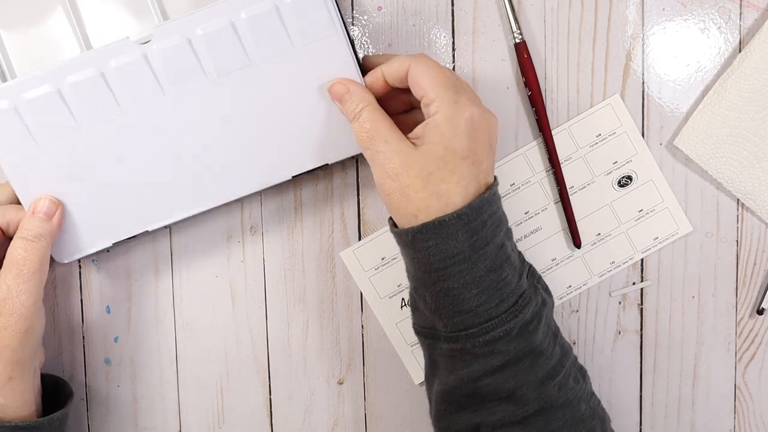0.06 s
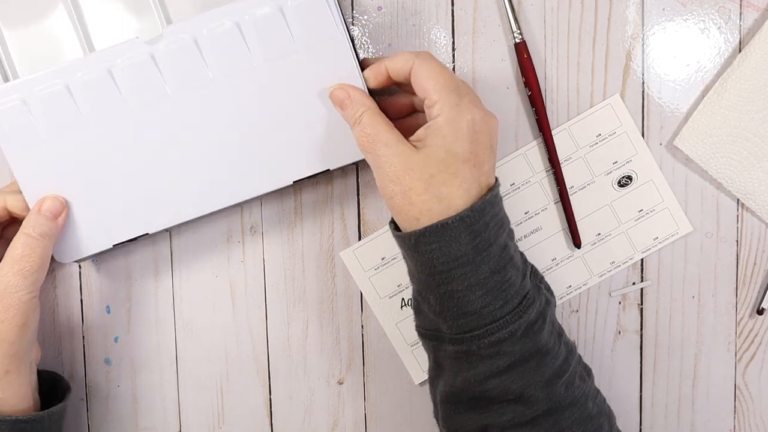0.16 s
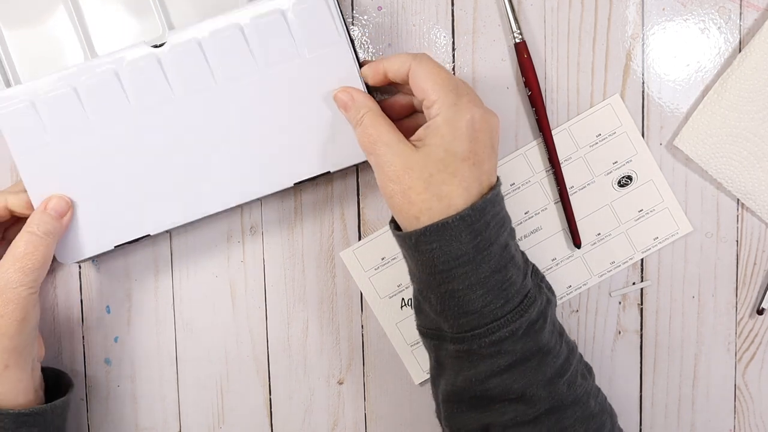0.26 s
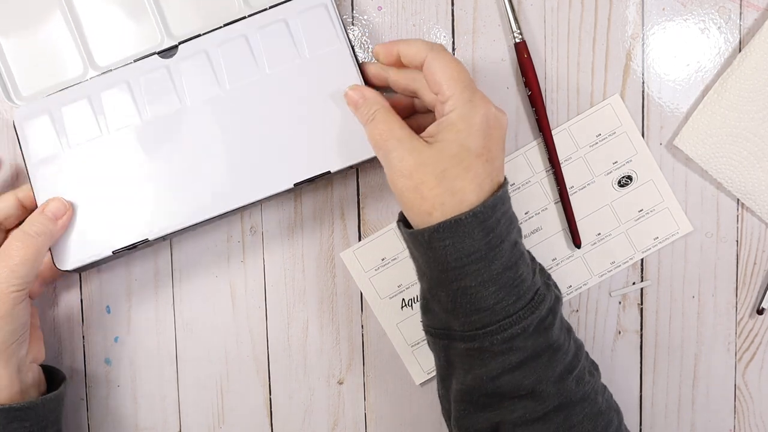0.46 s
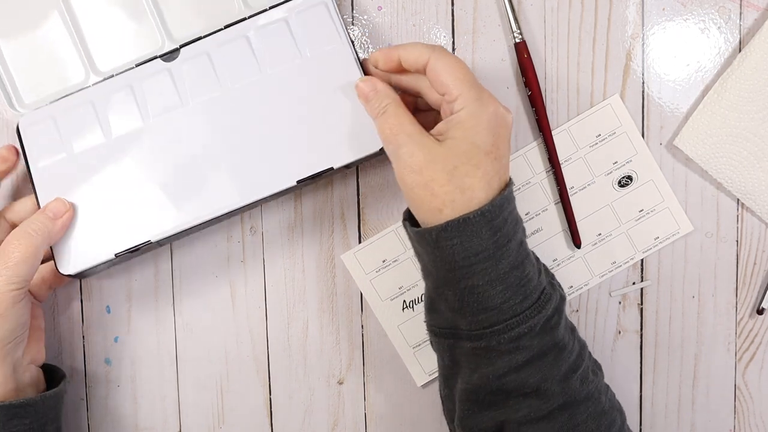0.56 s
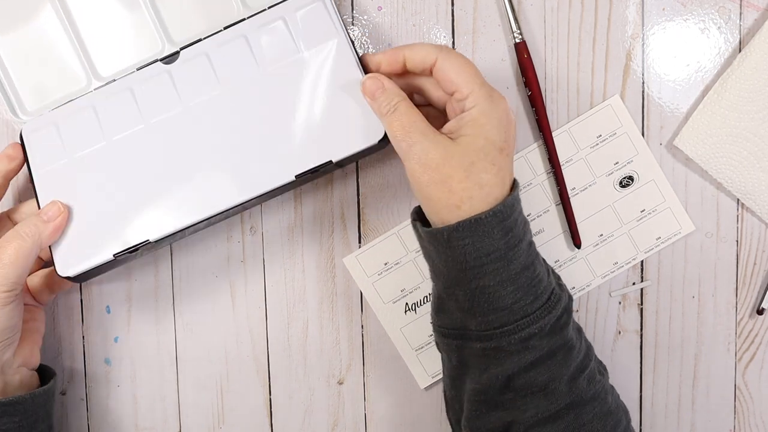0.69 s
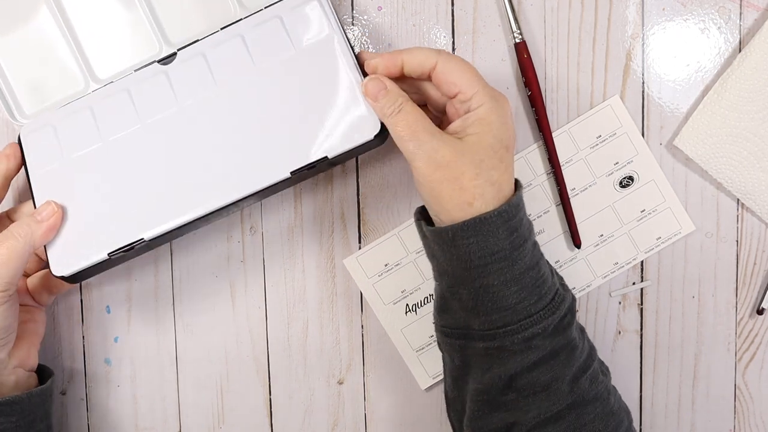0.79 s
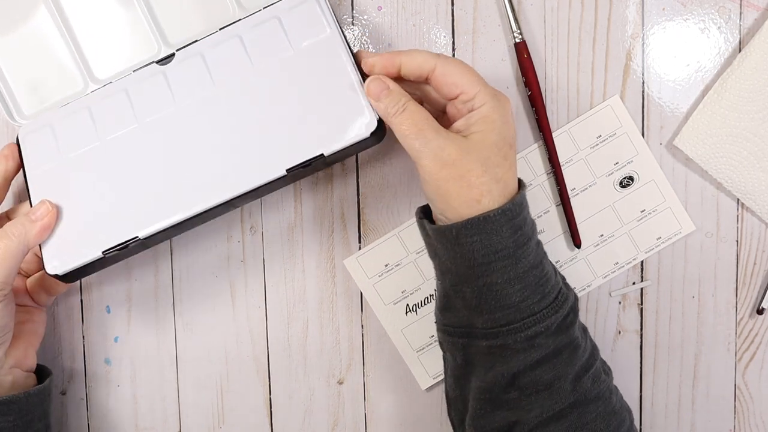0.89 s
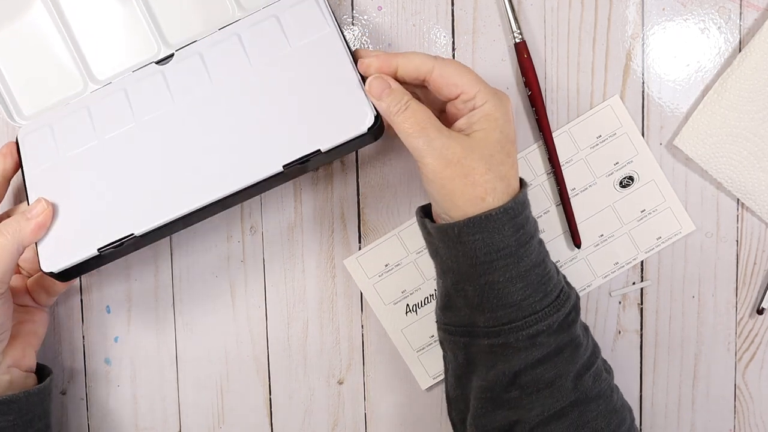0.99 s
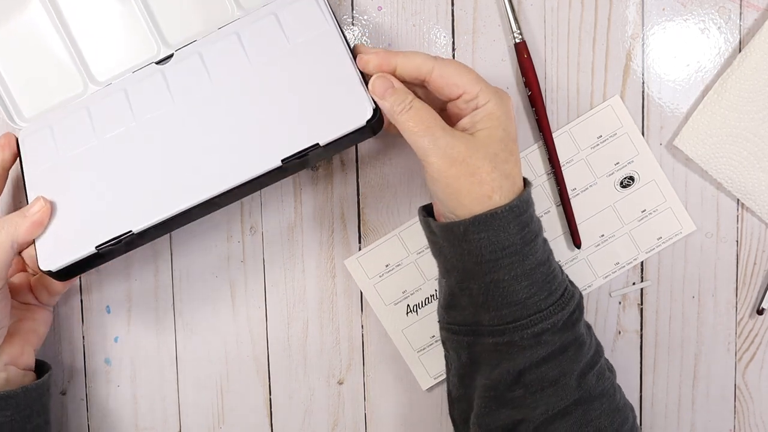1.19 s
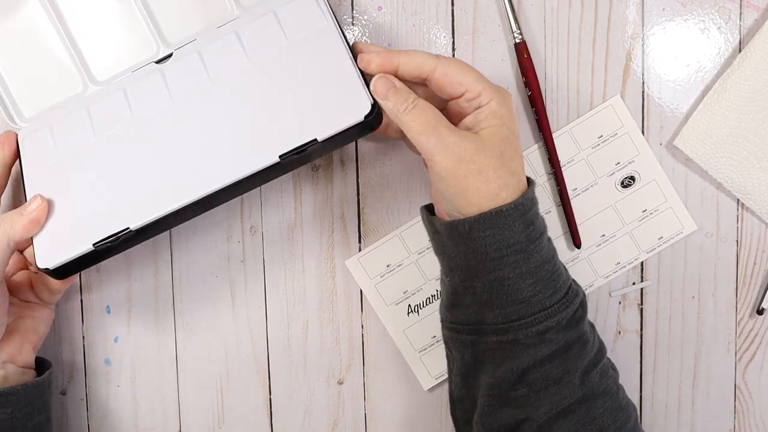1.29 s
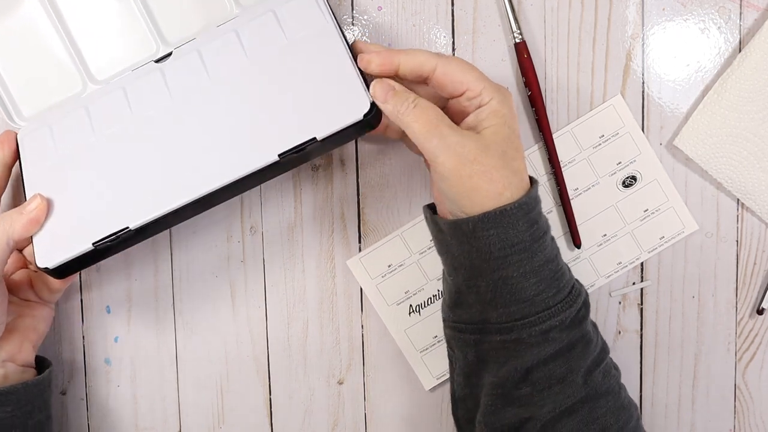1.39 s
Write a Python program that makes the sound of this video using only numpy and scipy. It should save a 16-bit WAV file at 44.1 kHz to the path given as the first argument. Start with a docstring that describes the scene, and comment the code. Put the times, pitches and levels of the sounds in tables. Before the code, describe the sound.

Close, mono sound of a metal paint tin lid ticking and flexing, then cracking free with a bright clank and short room echo; a muffled tap and a light tap pair follow over faint room noise.

```python
"""First, fingers rub and a tin rumbles on a wooden table over the faint noise of a quiet room.
Two hands prise at the metal lid: the thin sheet ticks, flexes with a dull knock, snaps free of its
catch and taps twice more, and a low boom lingers after the stronger blows.
Rub, rumble and room are coloured noise; booms and bending modes are decaying sines.
Each contact on the lid layers a crack, a crash of noise bands, blurred ringing modes and a room echo."""
import sys
import numpy as np
from scipy import signal
from scipy.fft import rfft, irfft
from scipy.io import wavfile
from scipy.ndimage import uniform_filter1d

SR = 44100
rng = np.random.default_rng(int(sys.argv[2]) if len(sys.argv) > 2 else 0)


def digitize_waveform(pressure):
    """Quantize a signal to 16-bit integers and store it at the path in sys.argv[1].

    Rows of a 2-D input are taken as channels; values are limited to [-1, 1].
    """
    field = np.atleast_2d(pressure).T
    bounded = np.clip(field, -1, 1)
    quanta = np.round(bounded * 32767).astype(np.int16)
    wavfile.write(sys.argv[1], SR, quanta)


N = 63945
T = np.arange(N) / SR
EDGES = 25 * 2 ** (np.arange(39) / 4)  # quarter-octave band edges [Hz]
CENTRES = np.sqrt(EDGES[1:] * EDGES[:-1])

# Colour of the room's faint noise: (frequency [Hz], relative density [dB per Hz])
FLOOR_SPECTRUM = [(71, -35), (120, -3), (216, -1), (319, -3), (611, -6), (649, -8.5), (796, -9.5),
                  (1990, -14), (15500, -20.5)]
FLOOR_DB = -67

# Fingers rubbing on the lid: (time [s], level [dB])
RUB_LEVEL = [(0, -60), (.09, -59), (.15, -67), (.19, -60.5), (.3, -64), (.65, -88), (.8, -74), (.95, -72.5),
             (1.45, -73.5)]
# Colour of the rub: (frequency [Hz], relative density [dB per Hz])
RUB_SPECTRUM = [(100, -6.5), (400, -2), (1400, 3.5), (2400, -4), (4000, -5), (6000, -16), (16000, -23)]
RUB_FLICKER_DB = 2  # standard deviation
# Rumble of the handled tin: (time [s], level [dB])
RUMBLE_LEVEL = [(0, -59), (.3, -57.5), (.42, -55.5), (.6, -57), (.88, -54.5), (1.0, -59.5), (1.45, -65)]
# Colour of the rumble: (frequency [Hz], relative density [dB per Hz])
RUMBLE_SPECTRUM = [(25, -14), (40, 3.5), (65, 5), (105, 0), (150, -11), (250, -22), (800, -66)]

# Low booms of table and room: (time [s], level [dB])
BOOMS = [(0.457, -40), (0.726, -45.5)]
# Modes of each boom: (frequency [Hz], level relative to the boom [dB], T60 [s])
BOOM_MODES = [(38.2, 0, 1.2), (66.2, -7.5, 1.1), (97.3, 5.5, 0.57)]
BOOM_RISE_S = 0.017

# Faint ticks and bumps of the rim, and a compact ping that is part of the lid's tap near 0.585 s: (time [s],
# level [dB], centre frequency [Hz])
RIM_TICKS = [(0.086, -59, 1360), (0.346, -49.5, 3750), (0.3635, -52, 8000), (0.465, -31, 1560),
             (.543, -48, 2860), (0.584, -39.5, 1240), (0.793, -57.5, 1140), (0.801, -53.5, 212),
             (0.701, -43.5, 260), (0.7, -43.5, 3960), (0.174, -46.5, 760), (0.211, -42.5, 3060),
             (0.803, -63, 4470), (0.944, -67.5, 6000)]
TICK_RISE_S, TICK_T60_S = 0.003, 0.054

# Dull knocks of the flexing sheet: (time [s], level [dB])
KNOCKS = [(.3333, -36.5), (.3438, -42)]
# Low bending modes of the sheet: (frequency [Hz], level relative to the knock [dB], T60 [s])
BENDING_MODES = [(191, -15, 0.6), (449, -10.5, 0.33), (513, -2.5, 0.037), (596, -3, 0.15), (770, 1.5, .12),
                 (928, 1.5, 0.11), (1085, -7, .09), (1231, -7.5, .1)]
# Colour of the dull wash around a knock: (frequency [Hz], relative density [dB per Hz])
KNOCK_WASH = [(100, -4), (200, 3), (300, -8.5), (480, 0), (1000, -3.5), (1500, -13), (4500, -24),
              (6000, -34), (16000, -47)]
WASH_DB, WASH_T60_S, KNOCK_RISE_S = -2.5, 0.65, 0.00061  # wash level is relative to the knock

# Contacts on the lid: (time [s], level [dB], brightness cutoff [Hz], low body boost [dB],
# ring level [dB], rise time constant [s], crash length factor [1], room level [dB], crack level [dB]);
# the boost and the last three levels are relative
CONTACTS = [ (.1722, -40, 6480, -4, -16, 0.0026, 1.33, -16, -4),
            (.2110, -30, 5410, -6, -3, 0.0013, 0.6, -34, 2),
            (.2155, -32.5, 9070, 10, -5, 0.00045, 1.3, -17, 2),
            (.3971, -14.5, 11000, -4.5, -0.5, 0.000038, 0.85, -13.5, -34),
            (.4070, -18.5, 12000, 2, -7.5, 0.00058, 1.16, -12, 1.5),
            (.5848, -35.5, 1580, -16, -4, 0.0011, 1.1, -17, -11),
            (.7016, -40.5, 11200, 17, -17, 0.000068, 0.97, -11, -12),
            (.7042, -38, 6760, -12, -18, 0.000088, 1.1, -14, -16),
            (.7150, -48, 4930, 21.5, 1.5, 0.00097, 2.4, -22, 8)]
# The lid's crowd of overlapping modes: (frequency [Hz], relative density [dB per Hz])
SHEET_SPECTRUM = [(100, -16), (180, -14.5), (290, -22.5), (450, -8.5), (630, -11), (800, -3), (1300, 4),
                  (2200, -3.5), (3600, -4.5), (6200, -15.5), (8200, -11), (11500, -19), (16000, -22)]
# Their decay under the hands, before the length factor: (frequency [Hz], T60 [s])
SHEET_T60 = [(200, 0.075), (1200, 0.037), (4000, 0.041), (14000, 0.079)]
# The lid's clear modes: (frequency [Hz], relative level [dB], T60 before finger damping [s])
LID_MODES = [(761, -16, .15), (815, -14, .19), (941, -14, .14), (1010, -15, .12), (1090, -13, .13),
             (1180, -11, .1), (1260, -11, .08), (1356, -7, .14), (1449, -12, .19), (1527, -13, .26),
             (1707, -13, .2), (1893, -12, .2), (2008, -15, .18), (2388, -19, .23), (2920, -13, .14),
             (3651, -14, .17), (4144, -17, .17), (4493, -21, .18), (5190, -21, .22), (8017, -18, .14)]
# Fingers shorten the rings; reflections blur their lines
RING_DAMPING, RING_BLUR_HZ = 0.79, 4.6
BODY_HZ = 580  # the low body boost fades out above this
CRACK_T60_S, CRACK_TILT_DB_PER_OCTAVE = 0.0084, 1.6
# Decay of the room echo: (frequency [Hz], T60 [s])
ROOM_T60 = [(150, 1.16), (700, 0.38), (1300, 0.326), (3000, 0.3521), (5200, 0.33), (9000, 0.2564),
            (15000, 0.15)]
# Colour of the room echo: (frequency [Hz], level [dB])
ROOM_COLOUR = [(150, -1), (800, -7), (1600, 2), (3000, -4), (5000, 4.5), (9000, 0.5), (15000, -3.5)]
ROOM_BUILD_S, BLOW_S = 0.02, 0.75  # echo build-up; span rendered for each contact
CUTOFF_HZ = 15900


def from_db(db):
    """Turn decibels into gain."""
    return 10 ** (np.asarray(db) / 20)


def at_hz(points, hz=CENTRES):
    """Read a table on a log-frequency axis, as a column."""
    f, v = np.transpose(points)
    return np.interp(np.log(hz), np.log(f), v)[:, None]


def band_gains(spectrum):
    """Gain of each quarter octave, for a total power of one."""
    gains = from_db(at_hz(spectrum)) * np.sqrt(CENTRES)[:, None]  # wider bands hold more power
    return gains / np.sqrt(np.sum(gains ** 2))


def noise_bands(size):
    """Split white noise into quarter-octave bands, each of RMS one."""
    white = rfft(rng.standard_normal(size))
    hz = np.arange(size // 2 + 1) * SR / size
    bands = []
    for low, high in zip(EDGES, EDGES[1:]):
        bands.append(irfft(white * ((hz >= low) & (hz < high)), size))
    bands = np.array(bands)
    return bands / bands.std(axis=1, keepdims=True)


def hiss(spectrum):
    """Steady noise of a given colour, RMS one."""
    hz = np.maximum(np.arange(N // 2 + 1) * SR / N, 1)
    colour = from_db(at_hz(spectrum, hz)[:, 0]) * (hz > EDGES[0])
    noise = irfft(rfft(rng.standard_normal(N)) * colour, N)
    return noise / noise.std()


def decay(t, t60):
    """Exponential decay, falling 60 dB in each T60."""
    return np.exp(-np.log(1000) * np.minimum(t / t60, 10))


def onset(start_s, rise_s):
    """Time since a blow, and its attack."""
    t = np.maximum(T - start_s, 0)
    return t, 1 - np.exp(-t / max(rise_s, 1 / SR))


def softness(hz, bright_hz):
    """A soft contact leaves the high modes quiet."""
    return 1 / np.sqrt(1 + (hz / bright_hz) ** 6)


def ring(t, hz, t60):
    """One mode dying away, its line blurred by a wandering phase."""
    wander = np.cumsum(rng.standard_normal(len(t))) * np.sqrt(2 * np.pi * RING_BLUR_HZ / SR)
    wander = uniform_filter1d(wander, size=200)
    phase = 2 * np.pi * (hz * t + rng.random()) + wander
    return np.sin(phase) * decay(t, RING_DAMPING * t60)


def room_floor():
    """The quiet room's noise, steady and faint."""
    return from_db(FLOOR_DB) * hiss(FLOOR_SPECTRUM)


def handling():
    """Fingers rub unevenly on the sheet while the tin rumbles on the table."""
    grip = uniform_filter1d(rng.standard_normal(N), size=500)
    rub_db = np.interp(T, *np.transpose(RUB_LEVEL)) + RUB_FLICKER_DB * grip / grip.std()
    rub = from_db(rub_db) * hiss(RUB_SPECTRUM)
    rumble_db = np.interp(T, *np.transpose(RUMBLE_LEVEL))
    rumble = from_db(rumble_db) * hiss(RUMBLE_SPECTRUM)
    return rub + rumble


def booms():
    """Low modes swell and linger after the stronger blows."""
    out = np.zeros(N)
    for start_s, db in BOOMS:
        t, attack = onset(start_s, BOOM_RISE_S)
        for hz, mode_db, t60 in BOOM_MODES:
            out += from_db(db + mode_db) * attack * np.sin(2 * np.pi * hz * t) * decay(t, t60)
    return out


def rim_ticks():
    """Small slips of the rim, and a compact ping within the lid's tap near 0.585 s: bursts of noise, each about
    an octave wide."""
    out = np.zeros(N)
    for start_s, db, hz in RIM_TICKS:
        t, attack = onset(start_s, TICK_RISE_S)
        octave = [hz / np.sqrt(2), hz * np.sqrt(2)]
        band = signal.butter(2, octave, "band", fs=SR, output="sos")
        grain = signal.sosfilt(band, rng.standard_normal(N))
        out += from_db(db) * grain / grain.std() * attack * decay(t, TICK_T60_S)
    return out


def knocks():
    """The pressed sheet gives way and sounds its low bending modes in a dull wash."""
    out = np.zeros(N)
    for start_s, db in KNOCKS:
        t, attack = onset(start_s, KNOCK_RISE_S)
        rings = np.zeros(N)
        for hz, mode_db, t60 in BENDING_MODES:
            tone = np.sin(2 * np.pi * (hz * t + rng.random()))
            rings += from_db(mode_db) * tone * decay(t, t60)
        wash = from_db(WASH_DB) * hiss(KNOCK_WASH) * decay(t, WASH_T60_S)
        out += from_db(db) * attack * (rings + wash)
    return out


def room_echo(t):
    """Reflections as noise bands that build up, then die away at their own rates."""
    build = 1 - np.exp(-t / ROOM_BUILD_S)
    return noise_bands(len(t)) * from_db(at_hz(ROOM_COLOUR)) * decay(t, at_hz(ROOM_T60)) * build


def lid():
    """Each contact sets off a crack, a short crash of dense modes, clear rings and the room's echo."""
    t = T[:int(BLOW_S * SR)]
    hz = CENTRES[:, None]
    out = np.zeros(N + len(t))
    room = room_echo(t)  # all contacts share one echo pattern
    crack = from_db(CRACK_TILT_DB_PER_OCTAVE * np.log2(hz / 1000)) * decay(t, CRACK_T60_S)
    for start_s, db, bright_hz, body_db, ring_db, rise_s, length, room_db, crack_db in CONTACTS:
        body = from_db(body_db / (1 + (hz / BODY_HZ) ** 4))
        colour = band_gains(SHEET_SPECTRUM) * softness(hz, bright_hz) * body
        crash_decay = decay(t, length * at_hz(SHEET_T60))
        crash = noise_bands(len(t)) * (crash_decay + from_db(crack_db) * crack)
        rings = np.zeros(len(t))
        for mode_hz, mode_db, t60 in LID_MODES:
            gain = from_db(ring_db + mode_db) * softness(mode_hz, bright_hz)
            rings += gain * ring(t, mode_hz, t60)
        noise = np.sum(colour * (crash + from_db(room_db) * room), axis=0)
        attack = 1 - np.exp(-t / rise_s)
        start = int(start_s * SR)
        out[start:start + len(t)] += from_db(db) * attack * (noise + rings)
    return out[:N]


def scene():
    """Mix the tin and the hands over the room's faint noise, in mono."""
    mix = room_floor() + handling() + booms() + rim_ticks() + knocks() + lid()
    return mix[None]


def record(dry, top_db=-11):
    """Round the highest peaks and cut the top of the spectrum."""
    top = from_db(top_db)
    rounded = top * np.tanh(dry / top)
    low_pass = signal.ellip(10, .1, 70, CUTOFF_HZ, fs=SR, output="sos")
    return signal.sosfilt(low_pass, rounded)


dry = scene()
out = record(dry)
digitize_waveform(out)
```